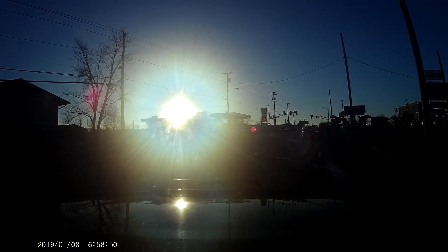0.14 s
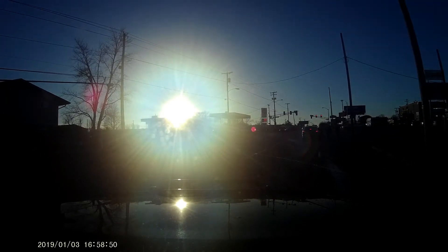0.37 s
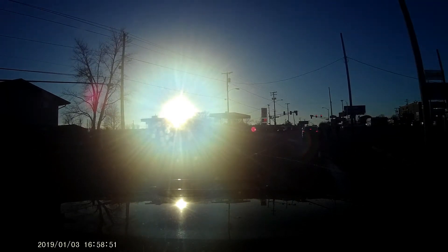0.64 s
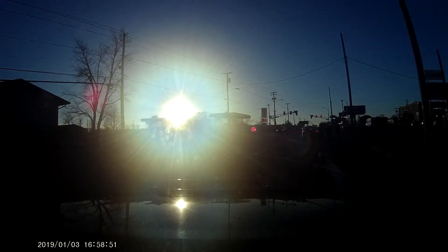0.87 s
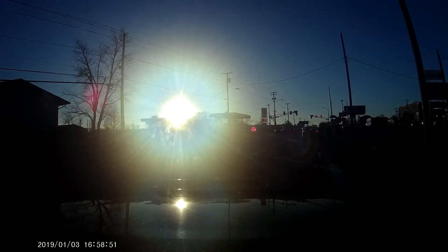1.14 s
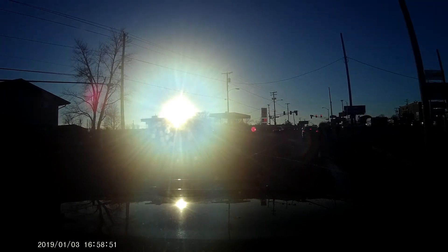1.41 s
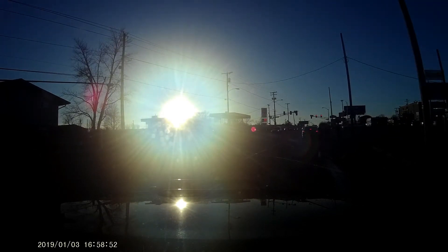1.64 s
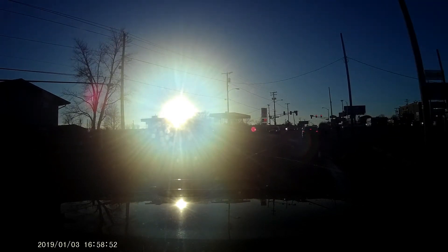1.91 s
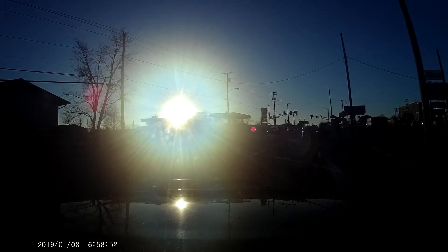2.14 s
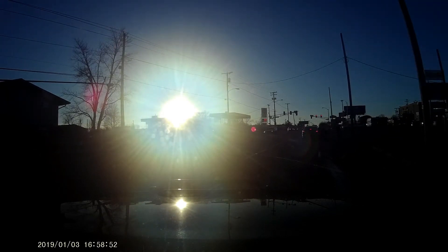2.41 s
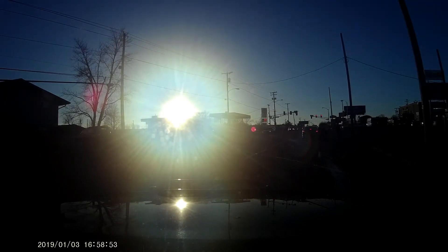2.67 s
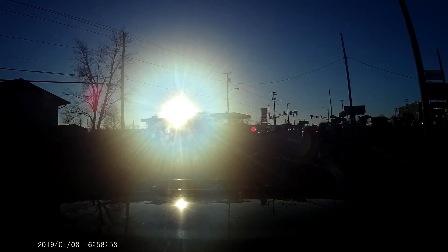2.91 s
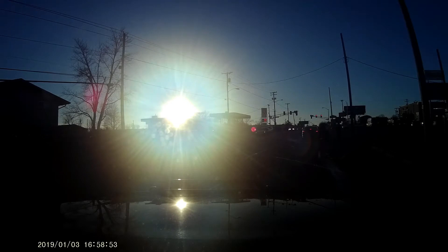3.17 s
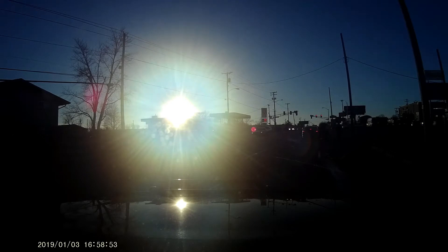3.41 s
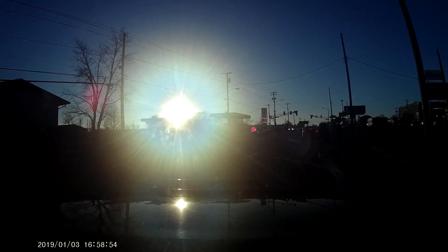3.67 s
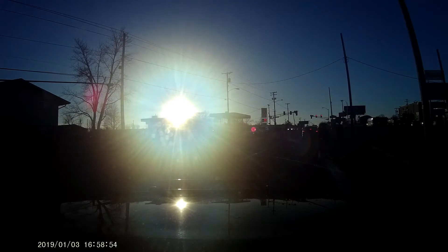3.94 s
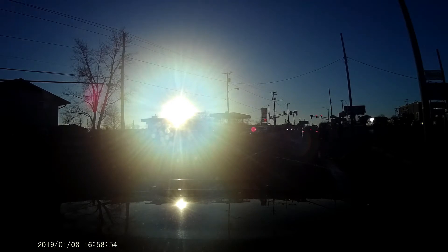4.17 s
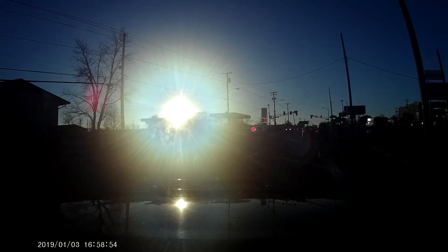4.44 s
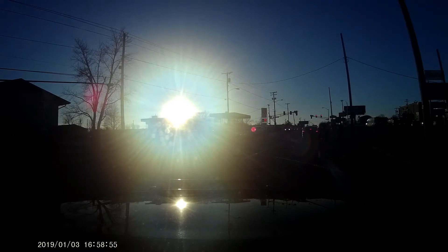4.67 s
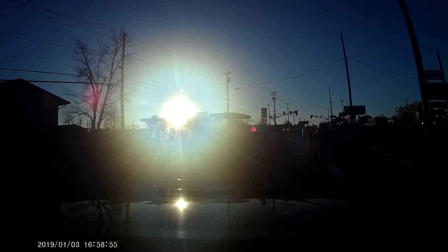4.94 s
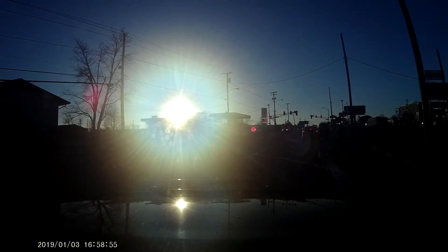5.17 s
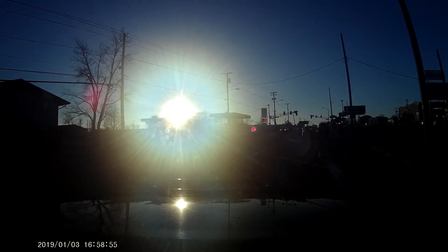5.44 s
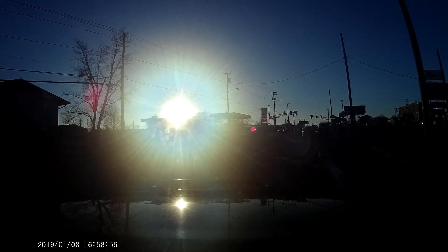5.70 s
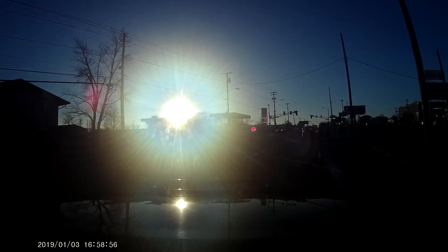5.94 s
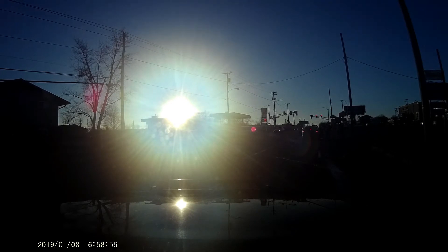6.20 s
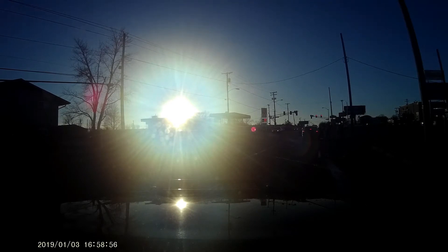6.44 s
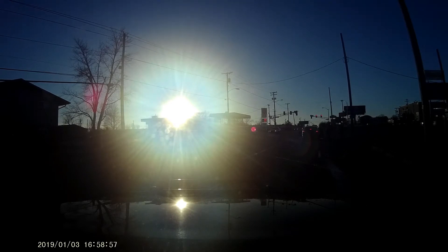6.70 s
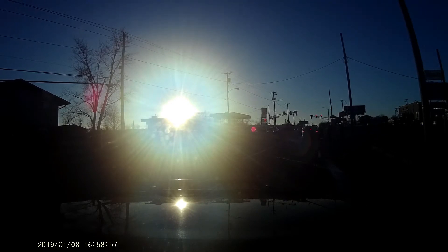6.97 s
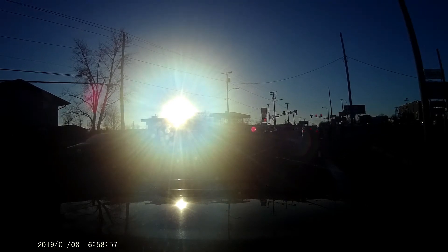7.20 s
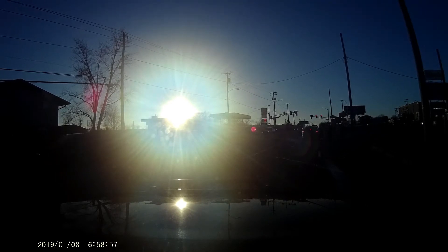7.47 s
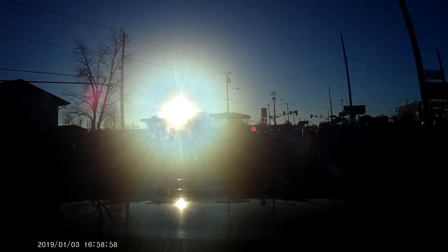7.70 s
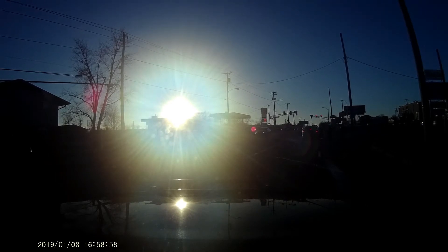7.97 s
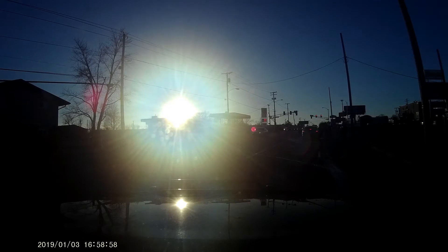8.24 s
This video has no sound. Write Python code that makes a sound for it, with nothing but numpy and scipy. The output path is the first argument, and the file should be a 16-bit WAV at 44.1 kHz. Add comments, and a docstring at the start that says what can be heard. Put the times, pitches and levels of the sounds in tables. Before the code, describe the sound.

Inside an idling pickup with open doors, traffic washes past, trim knocks and clicks, then two heavy door slams overload the microphone and hush the street.

```python
"""Pickup cab, two doors slam

Close inside an idling pickup with its doors open, heard by a small dashboard camera's microphone.
Street noise (shaped noise, swelling as vehicles pass) and engines (wavering sines) pour in.
Knocks and rattles are noise bursts through trim and door resonances; cab air booms as damped sines.
Two door slams overload the microphone and its gain control ducks the hum; the second shuts the street out.
"""
import sys
import numpy as np
from scipy import signal
from scipy.io import wavfile
from scipy.ndimage import uniform_filter1d

SR = 44100
rng = np.random.default_rng(int(sys.argv[2]) if len(sys.argv) > 2 else 0)


def unload_audio(sound):
    """Save the sound as a 16-bit wav file, at the path given as the first command line argument."""
    columns = np.transpose(np.atleast_2d(sound))
    # keep every value between -1 and 1, then stretch to whole-number steps
    steps = np.round(np.clip(columns, -1, 1) * 32767)
    wavfile.write(sys.argv[1], SR, steps.astype(np.int16))


def boost_factor(decibels):
    """Convert a level in decibels to a linear amplitude factor."""
    exponent = np.asarray(decibels, float) / 20
    return 10 ** exponent


N = 368235

# Idling cab and microphone hiss, relative spectrum: pitch_hz, density_db [dB per Hz]
CAB_HISS_COLOUR = [(12, 8), (20, -5.5), (81, -5.5), (96, 1.5), (154, -6.5), (172, -6), (347, -8.5),
                   (388, -6.5), (949, -16), (1220, -9.5), (1660, -24.5), (3950, -35.5), (11100, -38.5),
                   (12100, -39), (16000, -44.5)]
CAB_HISS_DB = -42

# Street noise through the open doors, relative spectrum: pitch_hz, density_db [dB per Hz]
STREET_COLOUR = [(94, -30), (160, -17), (180, -9.5), (270, -5.5), (463, -8.5), (849, 0.5), (972, -1.5),
                 (1430, 0.5), (1610, -5.5), (2110, -14), (2500, -26.5), (3440, -21), (9000, -43),
                 (11700, -78), (19800, -120)]
# Low street rumble, relative spectrum: pitch_hz, density_db [dB per Hz]
RUMBLE_COLOUR = [(20, 1), (40, -11), (60, -19), (120, 11.5), (165, -12.5)]
# Hollows around the dashboard microphone: pitch_hz, width_hz, level_db (level not used)
DASH_HOLLOWS = [(883, 52, 0), (1099, 42, -3), (1475, 80, -2), (2100, 67, -15), (3120, 280, -26),
                (7560, 610, -37)]
ROAR_DB, GROWL_DB, HISS_DB, RUMBLE_DB = -36.5, -46.5, -61.5, -42.5  # far traffic
# Vehicles going by: closest_s, half_power_s (time off closest), tyre_roar_db, engine_growl_db, hiss_db
PASSES = [(1.55, 0.88, -32.5, -46, -53.5), (5.1, 0.65, -33.5, -35.5, -53), (6.3, 0.35, -40.5, -40.5, -61)]
# A lorry slows beside the cab, then pulls away: time_s, pitch_hz, level_db
LORRY = [(1.5, 66.5, -59), (2.2, 61.5, -57), (2.8, 51.8, -42.5), (3.3, 49, -43.5), (3.83, 47, -35),
         (4.3, 44.4, -50), (4.75, 49.6, -37.5), (5.05, 60, -49.5), (5.8, 66.5, -45.5), (6.95, 68, -56)]
# Lorry engine orders: multiple [of engine pitch], level_db
LORRY_ORDERS = [(1, -2), (2, -10.5), (3, 1), (4, -19), (5, -13), (6, -21)]
# A drone near 290 Hz that wavers in pitch: time_s, pitch_hz, level_db
DRONE = [(3.5, 296, -76), (4.15, 302, -41), (4.45, 300, -49.5), (4.7, 270, -47), (5.25, 282, -33),
         (5.75, 287, -44), (6.65, 296, -48), (6.85, 277, -42)]
# Its two partials: multiple [of the note], level_db
DRONE_PARTIALS = [(1, 0), (1.14, -10.5)]
SEALED_S = 6.97  # the last door seals

# How much idle the doors let in from then on: start_s, level_db
DOOR_STATES = [(0, -43), (1.35, -39), (5.6, -39.5), (7.1, -43)]
# Idle engine orders: multiple [of firing rate], level_db
IDLE_ORDERS = [(1, 2), (2, -7.5), (3, -10), (4, -9)]
IDLE_HZ = 35.7  # firing rate

# A sleeve brushes the seat: centre_s, half_length_s, level_db
SLEEVE = (0.71, 0.092, -52.5)
# Cloth hiss, relative spectrum: pitch_hz, density_db [dB per Hz]
CLOTH_COLOUR = [(3000, -1), (4500, 5), (8000, -12), (15000, -14)]

# Trim and door panel modes, in four groups: pitch_hz, width_hz, level_db
PANEL_BODY = [(197, 75, -5), (300, 81, -2), (351.5, 88, -7)]
# Skin group: pitch_hz, width_hz, level_db
PANEL_SKIN = [(664, 207, -2.5), (863, 214, 1), (1142, 233, -1), (1364, 150, -6.5)]
# Treble group: pitch_hz, width_hz, level_db
PANEL_TREBLE = [(2143, 450, 9.5), (2630, 2200, 0), (3340, 680, 4.5), (3940, 1220, 1.5), (4810, 3100, -22)]
# Edge group: pitch_hz, width_hz, level_db
PANEL_EDGE = [(7500, 1300, 0), (9800, 4000, -5), (13000, 5000, -5)]
# Blows on trim, latch and frame: start_s, skin_peak_db, then against it body_db, treble_db, edge_db
KNOCKS = [(1.298, -27, 0, -8, -34), (1.324, -17, -6, -14.5, -30), (1.335, -18.5, -5.5, -10.5, -16),
          (1.469, -22.5, -6, -29, -36), (1.718, -12.5, -9.5, -1, -19), (1.726, -13.5, -6, -3.5, -20),
          (4.79, -27, -15, -8, -37), (5.345, -8.5, 5, -28, -36), (5.354, 0, 5, -14, -38),
          (5.363, 8, -13, -13.5, -29), (6.387, -25.5, -20, -5.5, -22), (6.597, -17.5, -2, -37, -50),
          (6.661, -16, -4, -26, -43), (6.856, -10.5, -7, -38, -52), (7.028, -3.5, -1.5, -24, -31),
          (7.036, 11, -14, -20.5, -30), (7.110, 5.5, -18, -24, -32), (7.119, 6.5, -14, -24, -30),
          (7.254, -14.5, -3, -5, -11), (7.366, -19.5, -6.5, -21, -30)]
# Loose glass and trim after each door lands: start_s, skin_peak_db, treble_db (against skin), hold_s, t60_s
RATTLES = [(5.365, -2.5, -7, 0.021, 0.27), (7.045, 2.5, -6.5, 0.063, 0.39)]
RATTLE_BODY_DB, RATTLE_EDGE_DB = -4, -11  # against skin, against treble
TICKS_PER_S, TICK_S, TICK_SPREAD_DB = 400, 0.0014, 1.5

# Low ringing of cab air and doors, by mode name: pitch_hz, t60_s
CAB_MODES = {"swing": (7.5, .8), "air": (23.5, .58), "seal": (22, .19), "body": (29.5, .5),
             "frame": (62, .17), "skin": (69.5, .42), "glass": (140, .3)}
# What sets them going: start_s, level_db (before it dies away), mode, direction of the pressure
PUSHES = [(1.318, -12, "frame", "out"), (1.331, -19, "body", "in"), (1.52, -23, "body", "in"),
          (1.63, -24.5, "body", "in"), (1.751, -24, "body", "in"), (5.342, -3, "seal", "out"),
          (5.3638, 16.5, "air", "in"), (5.3747, 13, "frame", "out"), (6.965, -17.5, "swing", "in"),
          (7.036, 13.5, "seal", "out"), (7.063, 12, "seal", "in"), (7.0879, 11, "skin", "in"),
          (7.091, 0.5, "glass", "out"), (7.176, 6, "body", "out")]

# Whine of the camera electronics: pitch_hz, level_db (ahead of the gain control)
CAMERA_WHINE = [(11899, -64)]
# Sudden jumps of the signal: start_s, step [full scale 1, ahead of clipping], decay_s (to 1/e)
POPS = [(5.4469, -0.36, 0.0047), (5.4889, -0.34, 0.0075), (6.9811, 0.075, 0.0011)]


def evened(x):
    """Scales to rms 1."""
    return x / np.sqrt(np.mean(x ** 2) + 1e-20)


def add(mix, s, sound):
    """Mixes a sound in at a time, cut off at the end of the mix."""
    part = mix[round(s * SR):][:len(sound)]
    part += sound[:len(part)]


def curve(table):
    """Turns a timed table into per-sample controls."""
    s, *columns = np.transpose(table)
    return [np.interp(np.arange(N) / SR, s, c) for c in columns]


def noise(colour, lo=0, hi=SR, patchy_db=1.5, peaks=(), lift=0):
    """Random short-time spectra with drifting patches, rms 1; each peak adds lift times the amplitude."""
    frames, hz = N // 512 + 5, np.fft.rfftfreq(2048, 1 / SR)
    real, imag, patches = rng.standard_normal((frames, 1025, 3)).T
    patches = uniform_filter1d(patches, size=14, axis=0)  # over frequency
    patches = evened(uniform_filter1d(patches, size=7, axis=1))  # over time
    f, db = np.transpose(colour)
    shape = boost_factor(np.interp(np.log(hz + 1), np.log(f + 1), db))
    shape = shape * (hz >= lo) * (hz < hi)
    shape = shape * (1 + lift * sum(1 / (1 + (2 * (hz - f) / w) ** 2) for f, w, _ in peaks))
    spectra = (real + 1j * imag) * shape[:, None] * boost_factor(patchy_db * patches)
    return evened(signal.istft(spectra, nperseg=2048, noverlap=1536)[1][:N])


def tone(hz, k=1):
    """Sine of rms 1 that follows k times a pitch curve."""
    return np.sqrt(2) * np.sin(2 * np.pi * (k * np.cumsum(hz) / SR + rng.random()))


def engine(hz, db, orders, waver_db):
    """Orders of an engine, sines that waver a little, each in its own way."""
    waver = uniform_filter1d(rng.standard_normal((len(orders), N)), size=6000, axis=1)
    total = 0
    for (k, order_db), w in zip(orders, waver):
        total = total + boost_factor(order_db + waver_db * evened(w)) * tone(hz, k)
    return boost_factor(db) * total


def cab_hiss():
    """Steady noise of the idling cab and the microphone, there throughout."""
    return boost_factor(CAB_HISS_DB) * noise(CAB_HISS_COLOUR, patchy_db=1.2)


def traffic():
    """Amplitudes of roar, growl and hiss: far traffic plus passes whose power falls with distance squared."""
    t = np.arange(N) / SR
    power = boost_factor([[ROAR_DB], [GROWL_DB], [HISS_DB]]) ** 2
    for s, half, *db in PASSES:
        power = power + boost_factor(np.array(db))[:, None] ** 2 / (1 + ((t - s) / half) ** 2)
    return np.sqrt(power)


def street():
    """Traffic noise, rumble, lorry and drone, fading out once the cab is sealed."""
    roar, growl, hiss = traffic()
    sound = roar * noise(STREET_COLOUR, 600, 2440, patchy_db=1.5, peaks=DASH_HOLLOWS, lift=1.0)
    sound += growl * noise(STREET_COLOUR, 160, 600, patchy_db=0.0)
    sound += hiss * noise(STREET_COLOUR, 2400, 8400, patchy_db=1.5, peaks=DASH_HOLLOWS, lift=0.57)
    sound += boost_factor(RUMBLE_DB) * noise(RUMBLE_COLOUR, 15, 165, patchy_db=3)
    sound += engine(*curve(LORRY), LORRY_ORDERS, waver_db=3.0)
    sound += engine(*curve(DRONE), DRONE_PARTIALS, waver_db=4)
    since_sealed = np.maximum(np.arange(N) / SR - SEALED_S, 0)
    return sound * boost_factor(-60 * since_sealed / 1.8)  # 60 dB down in 1.8 s


def idle():
    """The pickup's own engine: steady firing orders, louder while doors stand open."""
    s, db = np.transpose(DOOR_STATES)
    state = np.searchsorted(s, np.arange(N) / SR + 1e-3) - 1
    level_db = uniform_filter1d(db[np.maximum(state, 0)], size=8000)  # eases each change
    return engine(np.full(N, IDLE_HZ), level_db, IDLE_ORDERS, waver_db=1.5)


def rustle():
    """A soft puff of cloth hiss as a sleeve brushes the seat."""
    s, half, db = SLEEVE
    puff = np.exp(-((np.arange(N) / SR - s) / half) ** 2)
    return boost_factor(db) * puff * noise(CLOTH_COLOUR, 3000, 15500, patchy_db=4.0)


def ring(burst, modes):
    """A burst through a set of steep panel resonances, peak 1."""
    out = 0
    for hz, width, db in modes:
        pole = signal.iirpeak(hz, hz / width, SR)
        once = signal.lfilter(*pole, burst)
        out = out + boost_factor(db) * signal.lfilter(*pole, once)  # twice, for steeper skirts
    return out / abs(out).max()


def panels(burst, body_db, treble_db, edge_db):
    """Four bursts, each through its own group of panel modes; the skin group peaks at 1."""
    groups = (PANEL_SKIN, PANEL_BODY, PANEL_TREBLE, PANEL_EDGE)
    levels_db = (0, body_db, treble_db, edge_db)
    return sum(boost_factor(d) * ring(b, modes) for b, modes, d in zip(burst, groups, levels_db))


def knock(db, body_db, treble_db, edge_db):
    """A sharp blow that excites the panels, then a short coarse tail."""
    t, t60 = np.arange(SR // 4) / SR, 0.03
    coarse = boost_factor(2 * evened(uniform_filter1d(rng.standard_normal(len(t)), size=90)))
    blow = 1 + 0.49 * np.exp(-t / .003)
    onset = np.minimum(t / 0.0013, 1)
    decay = boost_factor(-60 * (t / t60) ** 1.45)
    burst = rng.standard_normal((4, len(t))) * coarse * blow * decay * onset
    return boost_factor(db) * panels(burst, body_db, treble_db, edge_db)


def rattle(db, treble_db, hold, t60):
    """Loose parts chatter: dense uneven ticks over a thin buzz shake the panels, dying away after a hold."""
    t = np.arange(SR // 2) / SR
    hits = rng.random(len(t)) < TICKS_PER_S / SR
    ticks = hits * boost_factor(TICK_SPREAD_DB * rng.standard_normal(len(t)))
    shake = 0.55 + signal.lfilter([1], [1, -np.exp(-1 / (TICK_S * SR))], ticks)
    decay = boost_factor(-60 * np.maximum(t - hold, 0) / t60)
    burst = rng.standard_normal((4, len(t))) * shake * decay
    return boost_factor(db) * panels(burst, RATTLE_BODY_DB, treble_db, treble_db + RATTLE_EDGE_DB)


def boom(db, mode, way):
    """One damped swing of pressure; friction in the seals stops it once it is small."""
    t, (hz, t60) = np.arange(SR) / SR, CAB_MODES[mode]
    swing = np.maximum(boost_factor(-60 * t / t60) - boost_factor(-28), 0)
    sign = 1 if way == "in" else -1
    return sign * boost_factor(db) * swing * np.sin(2 * np.pi * hz * t)


def scene():
    """Street, engine and blows as they reach the dashboard."""
    mix = cab_hiss() + street() + idle() + rustle()
    for sound, table in ((knock, KNOCKS), (rattle, RATTLES), (boom, PUSHES)):
        for s, *row in table:
            add(mix, s, sound(*row))
    return mix[None]


def gain_control(x):
    """Turns loud sound down, lagging the blow, then recovers at a steady rate."""
    power_db = 10 * np.log10(signal.lfilter([.001], [1, -.999], x ** 2) + 1e-12)
    cut_db = np.clip(3 * (power_db + 7), 0, 13.5)
    rise = np.arange(N) * 130. / SR  # recovery, dB a second
    cut_db = np.maximum(np.maximum.accumulate(cut_db + rise) - rise, 0)
    keep = np.exp(-1 / (.02 * SR))  # lag of 20 ms
    return x * boost_factor(-signal.lfilter([1 - keep], [1, -keep], cut_db))


def top_cut(x):
    """Nothing passes above the cut-off."""
    return signal.sosfilt(signal.butter(12, 16490, fs=SR, output="sos"), x)


def record(dry):
    """Dashboard camera: whine, gain control, pops, hard clipping, coupling capacitor, band limit."""
    [(whine_hz, whine_db)] = CAMERA_WHINE
    x = dry[0] + boost_factor(whine_db) * tone(np.full(N, whine_hz))
    x = gain_control(x)
    for s, step, decay in POPS:
        add(x, s, step * np.exp(-np.arange(2000) / SR / decay))
    x = np.clip(x, -.97, .97)
    x = signal.lfilter(*signal.butter(1, 1.5, "high", fs=SR), x)  # coupling capacitor
    x = signal.sosfilt(signal.butter(10, 15700, fs=SR, output="sos"), x)
    return top_cut(x[None])


dry = scene()
out = record(dry)
unload_audio(out)
```